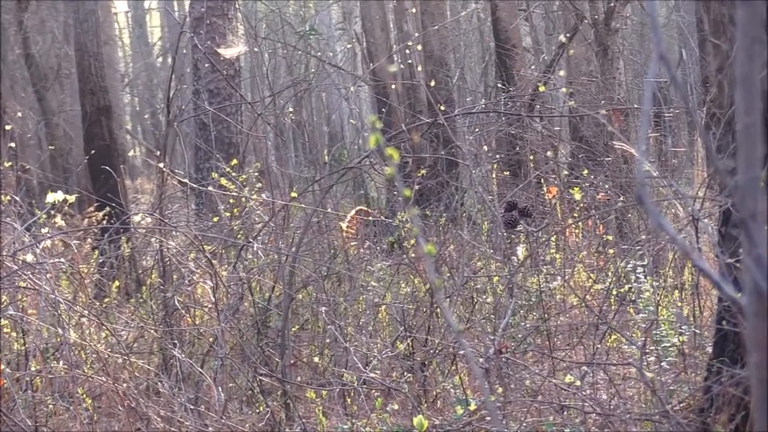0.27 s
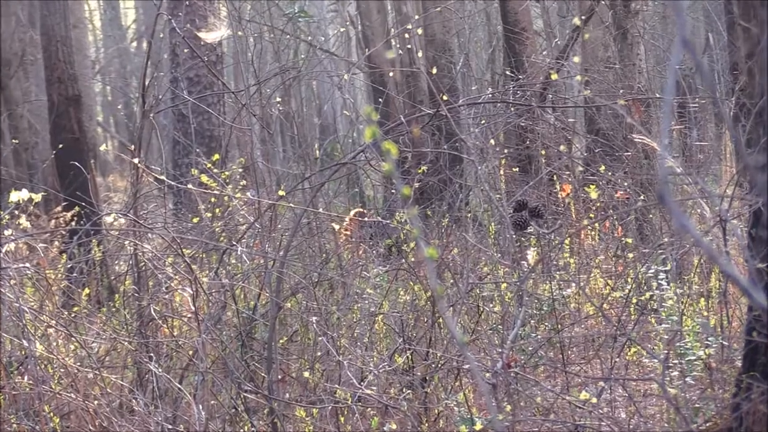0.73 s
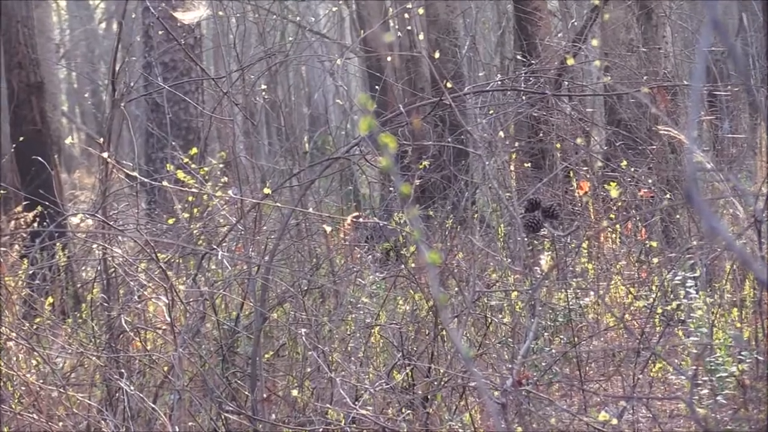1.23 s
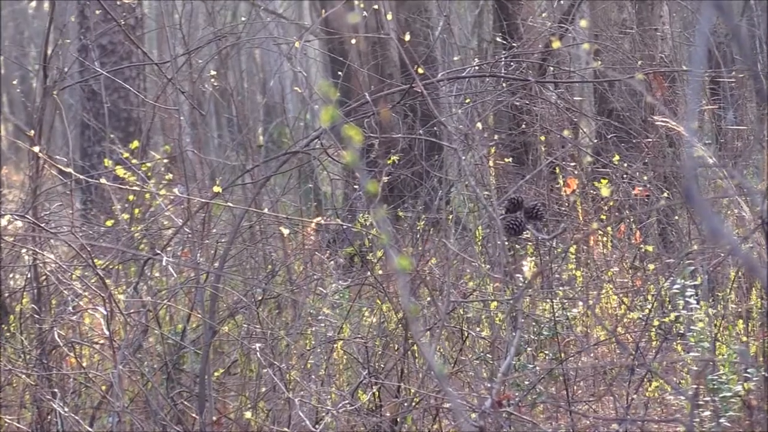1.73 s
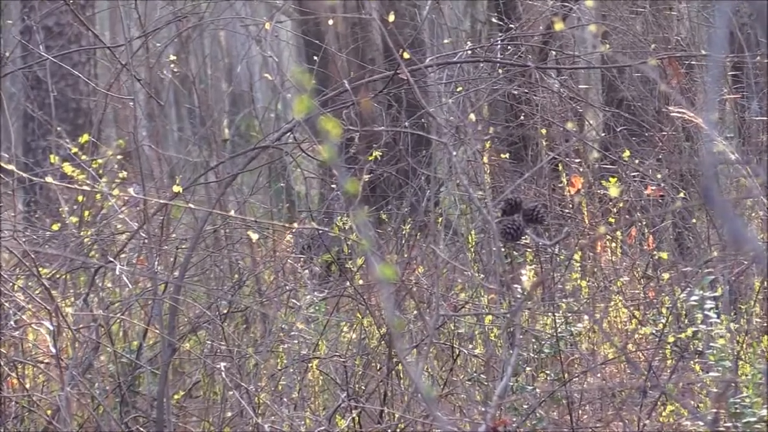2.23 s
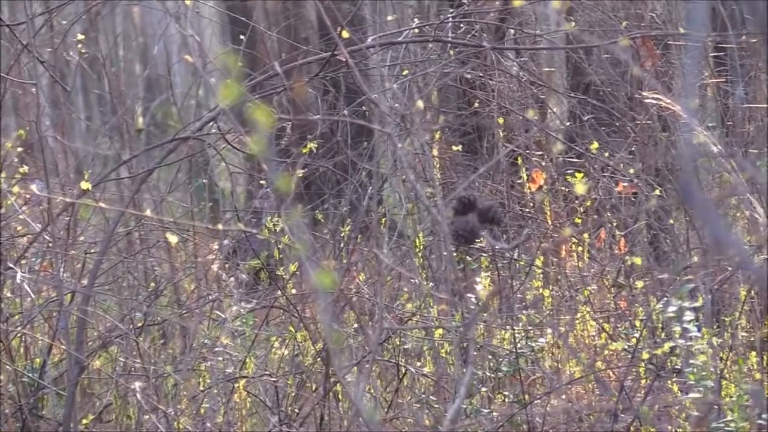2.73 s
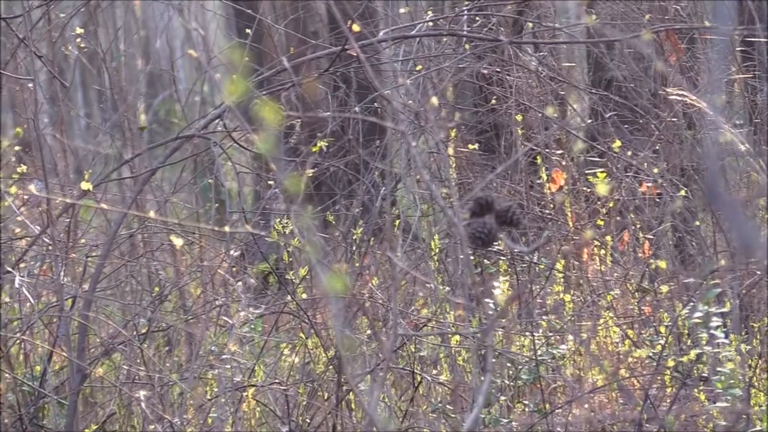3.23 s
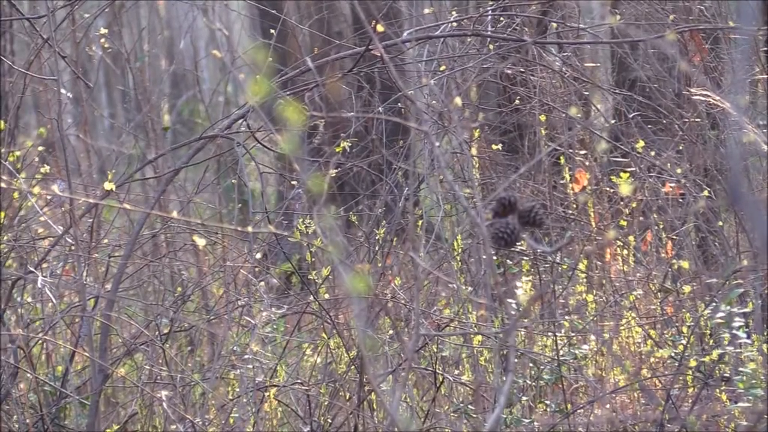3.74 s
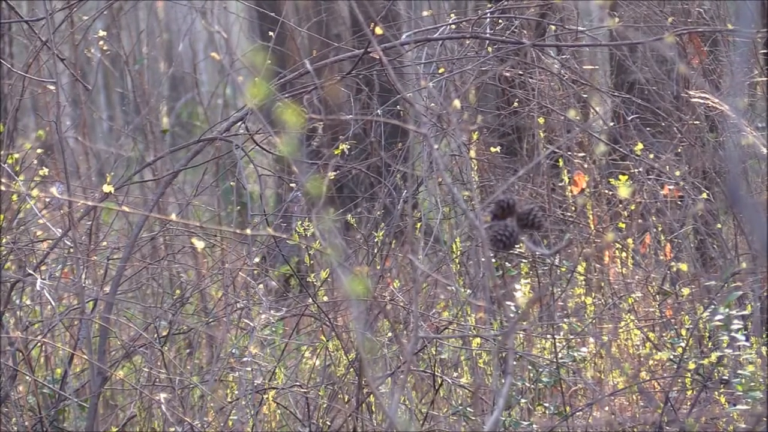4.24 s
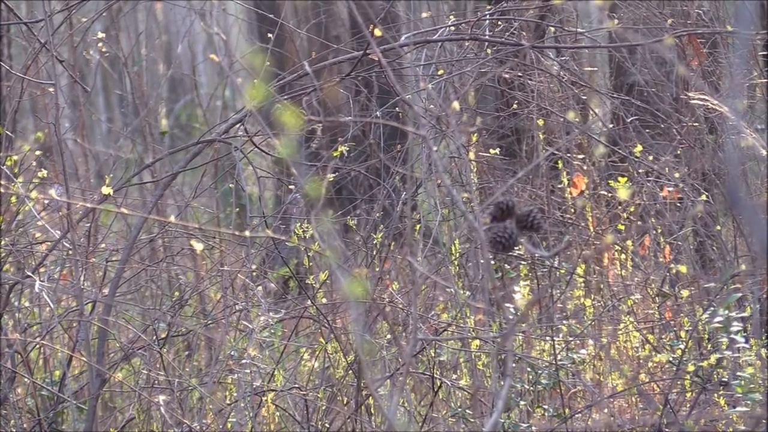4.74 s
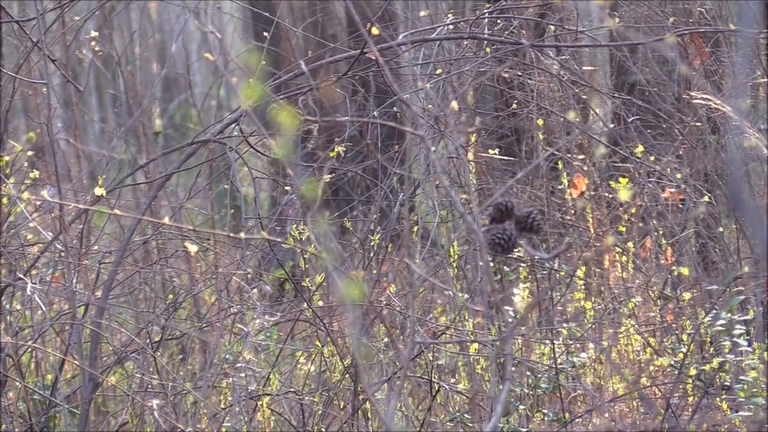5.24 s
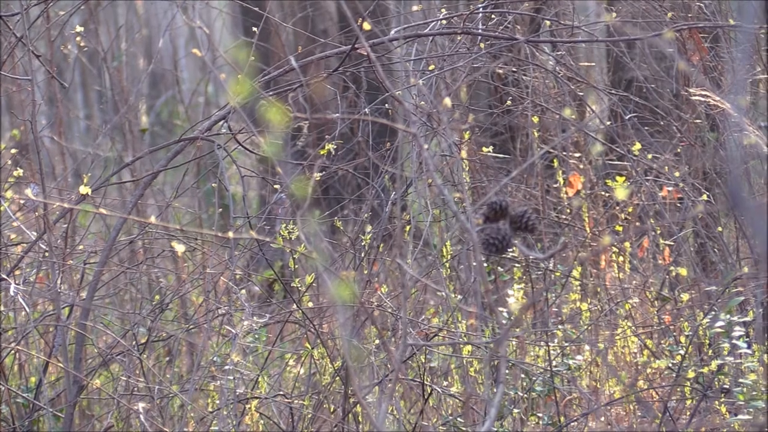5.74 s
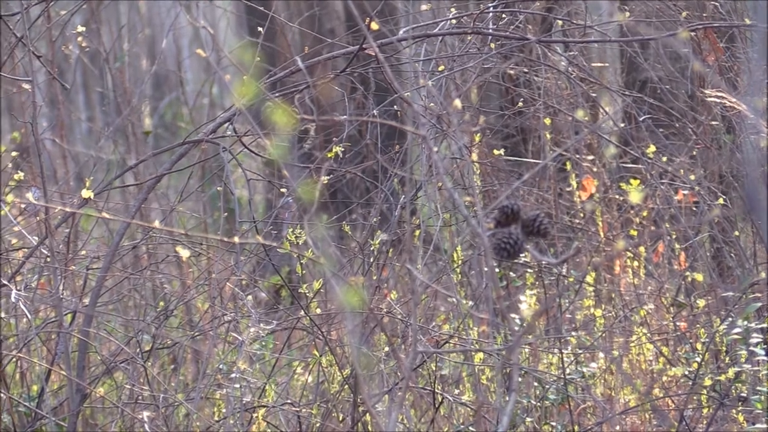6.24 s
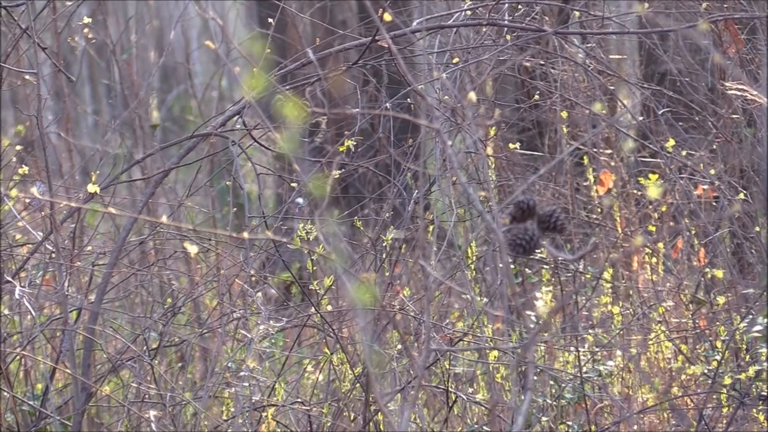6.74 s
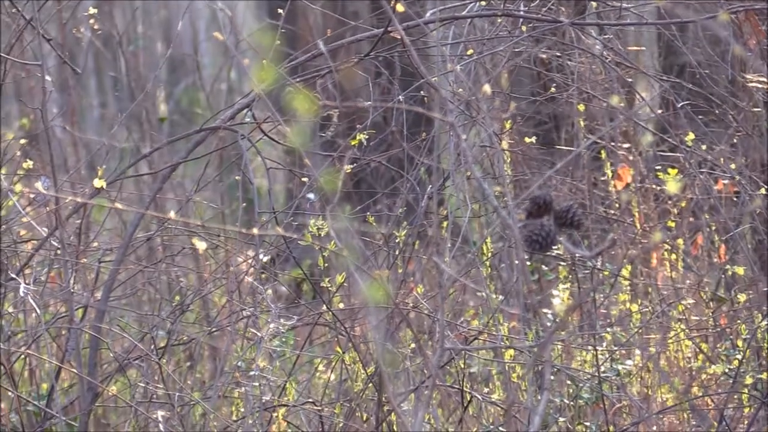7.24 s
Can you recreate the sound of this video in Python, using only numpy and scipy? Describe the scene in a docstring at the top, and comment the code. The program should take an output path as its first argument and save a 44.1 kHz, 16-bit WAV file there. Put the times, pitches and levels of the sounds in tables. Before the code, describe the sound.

In open woods, distant birds sing in a soft haze over low airy rush and a faint wavering hum. Two thin whistles slide downward, then a buzzy song climbs in pitch. Midway, a turkey call close to the microphone gives a cluck and five raspy yelps, each breaking from a clear high note to a rougher low one, echoing off trunks. Evenly spaced chips and a swelling trill finish.

```python
"""Turkey call in open woods, morning

Close to the microphone a turkey call, likely a hunter's mouth call, gives one cluck and five raspy yelps, each
a clear high note that breaks into a lower, rougher one: sine overtones, random pulses ringing resonances, and
filtered noise for breath. Songbirds whistle, chip, trill and buzz as gliding sines, and the trunks echo all of
it. Banded noise makes the far chorus and the air, wavering sines the far drone; the camera adds hiss, a few
soft bumps and faint ticks."""
import sys
import numpy as np
from scipy import signal
from scipy.fft import rfft, irfft, next_fast_len
from scipy.io import wavfile
from scipy.ndimage import uniform_filter1d, map_coordinates

SR = 44100
rng = np.random.default_rng(int(sys.argv[2]) if len(sys.argv) > 2 else 0)


def to_wav(sig):
    """Store sig (one row per channel, or 1-D mono) as 16-bit WAV at the path in sys.argv[1].

    Samples outside -1..1 are clipped; the rate is SR.
    """
    pcm = np.clip(np.atleast_2d(sig), -1, 1) * 32767
    pcm = np.round(pcm).astype(np.int16)
    wavfile.write(sys.argv[1], SR, pcm.T)  # frames by channels


N = 329868


def amp(db):
    """Decibels to gain."""
    return 10 ** (np.asarray(db) / 20)


def unit(x):
    """x at rms 1."""
    return x / np.sqrt(np.mean(x ** 2) + 1e-20)


def along(points, hz):
    """Interpolate (Hz, value) points on a log frequency axis."""
    f, v = np.transpose(points)
    return np.interp(np.log(hz + 1), np.log(f + 1), v)


def curves(rows):
    """One value per sample for each column after the time."""
    s, *cols = np.transpose(rows)
    return [np.interp(np.arange(N) / SR, s, c) for c in cols]


def note(rows, fade=0.0013):
    """First sample, a soft-edged gate and the columns, from first row to last."""
    s, *cols = np.transpose(rows)
    t = np.arange(s[0], s[-1], 1 / SR)
    gate = np.clip(np.minimum(t - s[0], s[-1] - t) / fade, 0, 1)
    return (round(s[0] * SR), gate, *[np.interp(t, s, c) for c in cols])


def add(track, start, x):
    """Mix x into track from sample start."""
    track[start:start + len(x)] += x[:len(track) - start]


def wobble(rate):
    """A smooth random curve, rate knots a second."""
    return map_coordinates(rng.standard_normal(int(N * rate / SR) + 4), [np.arange(N) * rate / SR])


def filtered(x, response):
    """x times a complex response of frequency."""
    m = next_fast_len(N + SR // 2)
    return irfft(rfft(x, m) * response(np.fft.rfftfreq(m, 1 / SR)), m)[..., :N]


def peak(f, hz, width_hz):
    """One causal resonance."""
    return 1j * f * width_hz / (hz * hz - f * f + 1j * f * width_hz)


def resonances(f, modes):
    """Steep-sided resonances, each applied twice; neighbours oppose each other, so the valleys are deep."""
    return sum((-1) ** k * amp(db) * peak(f, hz, width) ** 2 for k, (hz, width, db) in enumerate(modes))


def span(f, low_hz, high_hz):
    """A flat band with steep edges."""
    return 1 / (1 + (2 * (f - (low_hz + high_hz) / 2) / (high_hz - low_hz)) ** 8)


def rush(response, patchy_db):
    """Filtered noise of rms 1 with patches of random gain over time and frequency."""
    z = signal.stft(rng.standard_normal(N), nperseg=512)[2]
    field = uniform_filter1d(uniform_filter1d(rng.standard_normal(z.shape), 5, 0), 12, 1)
    patchy = signal.istft(z * amp(patchy_db * unit(field)), nperseg=512)[1][:N]
    return unit(filtered(patchy, response))


def whistle(track, rows, overtone_db=-40, rough_hz=0):
    """Add a gliding sine with a weak octave; rows (s, Hz, dB rms)."""
    start, gate, hz, db = note(rows)
    shake = np.repeat(rng.standard_normal(len(hz) // 100 + 1), 100)[:len(hz)]
    turn = 2 * np.pi * np.cumsum(hz + rough_hz * uniform_filter1d(shake, size=100)) / SR
    add(track, start, np.sqrt(2) * gate * amp(db) * (np.sin(turn) + amp(overtone_db) * np.sin(2 * turn)))


def series(first, last, period, first_db, last_db):
    """Evenly spaced notes under a steady change of level: rows (s, dB)."""
    return np.linspace((first, first_db), (last, last_db), round((last - first) / period) + 1)


def hiss():
    """Camera hiss common to both channels: patchy coloured noise with nothing below 1 kHz."""
    # colour of the hiss before it is set to its level: (frequency [Hz], relative density [dB per Hz])
    hiss_colour = [(1200, 8.5), (2000, 3.5), (4500, -21), (6000, 0), (7500, -1.5), (11000, -4),
                   (15700, -6.5)]
    return amp(-75) * rush(lambda f: amp(along(hiss_colour, f)) * (f > 1000), patchy_db=1.5)


def side_hiss():
    """Noise of opposite sign in the two channels, which gives the hiss its width."""
    # colour of the side noise before it is set to its level: (frequency [Hz], relative density [dB per Hz])
    side_colour = [(15, -34), (25, -8), (101, -3.5), (411, -9), (827, -19), (1310, -15.5), (2700, -19.5),
                   (7120, -14), (15500, -17)]
    return amp(-78.5) * rush(lambda f: amp(along(side_colour, f)), patchy_db=-1.5)


def wind():
    """Far wind and traffic: coloured noise whose level drifts slowly."""
    # course of the air: (time [s], level [dB])
    air_course = [(0, -61.5), (.3, -60), (2.2, -63.5), (2.7, -62.5), (6.27, -64), (6.9, -60.5),
                  (7.48, -61.5)]
    # colour of the air: (frequency [Hz], relative density [dB per Hz])
    air_colour = [(15, -50), (25, -18.5), (97, -8), (135, -5), (174, -9), (216, -7), (346, -10),
                  (471, -7.5), (525, -4), (585, -9.5), (826, -7), (1100, -16), (1400, -20.5), (1700, -26.5),
                  (1900, -25), (2470, -45), (4180, -120)]
    level_db = curves(air_course)[0] + 0.37 * wobble(7)
    return amp(level_db) * rush(lambda f: amp(along(air_colour, f)), patchy_db=1.5)


def drone():
    """A far hum: low sines that waver at random in pitch and strength."""
    # course of the whole hum: (time [s], level [dB])
    drone_course = [(0, -66), (2.1, -68), (2.35, -63), (3.17, -63.5), (3.37, -56.5), (4.54, -64),
                    (4.94, -60), (5.31, -80), (6.48, -65.5), (7.48, -92)]
    # lines of the hum: (pitch [Hz], twice the scale of its waver [Hz], level within the hum [dB])
    drone_lines = [(138.3, 9.6, -1.5), (125, 1.9, -13.5)]
    lines = np.zeros(N)
    for hz, waver, db in drone_lines:
        strength = amp(db + 1.57 * wobble(16))
        pitch = hz + waver * wobble(14) / 2
        lines += strength * np.sin(2 * np.pi * np.cumsum(pitch) / SR)
    return amp(curves(drone_course)[0]) * lines


def gusts():
    """Slow pressure on the microphone: a smooth random curve that swells with each gust."""
    # gusts: (time of the peak [s], peak level [dB], rise and fall time each [s])
    gust_peaks = [(2.91, -64, .4), (4.65, -72, 0.55), (7.23, -77, .2)]
    calm_db = -91.5
    t = np.arange(N) / SR
    push_db = calm_db + sum((db - calm_db) * np.clip(1 - abs(t - s) / width, 0, 1) for s, db, width in gust_peaks)
    return amp(push_db) * wobble(70)


def whine():
    """A faint steady tone that fades in and out."""
    # stretches of the tone: (start [s], end [s], level after the fade in [dB], level before the fade out [dB])
    whine_spans = [(0.298, 3.03, -83.5, -80), (5.301, 6.8, -80, -83)]
    hz, fade_s = 1400, 0.32
    track = np.zeros(N)
    for s, end, first_db, last_db in whine_spans:
        whistle(track, [(s, hz, first_db - 13), (s + fade_s, hz, first_db),
                        (end - fade_s, hz, last_db), (end, hz, last_db - 16)])
    return track


def handling():
    """Soft bumps on the camera body as dying low sines, and faint dry ticks as bright noise."""
    # bumps: (time [s], level before onset and decay [dB], pitch [Hz])
    bumps = [(2.88, -51, 129), (3.057, -49, 209), (4.5, -56, 168), (7.192, -58, 68)]
    # ticks: (time [s], gain of the noise at the start [dB])
    ticks = [(3.4144, -81), (7.1402, -57)]
    track, t = np.zeros(N), np.arange(SR // 8) / SR
    for s, db, hz in bumps:
        onset = 1 - np.exp(-t / 0.0013)
        add(track, round(s * SR), amp(db - 60 * t / 0.1) * np.sin(2 * np.pi * hz * t) * onset)
    for s, db in ticks:
        add(track, round(s * SR), amp(db - 60 * t / .012) * np.diff(rng.standard_normal(len(t) + 1)))
    return track


def chorus():
    """Distant singers, blurred by the trees into a haze of noise over the range of their songs."""
    # course of the haze: (time [s], level of the low, middle and high singers [dB each])
    chorus_course = [(0, -77, -76.5, -82.5), (.8, -82.5, -80, -84), (1.15, -73, -74, -86),
                     (1.75, -78, -78, -85), (2.1, -77, -75.5, -78.5), (2.9, -69, -74, -84),
                     (3.6, -76, -77.5, -81), (4.35, -80.5, -76, -84), (5.3, -69.5, -74.5, -82),
                     (5.8, -65.5, -65.5, -81.5), (6.6, -65.5, -64.5, -79), (7.48, -71.5, -71.5, -81)]
    # range of each group of singers: (lowest [Hz], highest [Hz])
    singers = [(2000, 3450), (3300, 4780), (4700, 5650)]
    return sum(amp(db) * rush(lambda f: span(f, *edges), patchy_db=1.5)
               for db, edges in zip(curves(chorus_course), singers))


def far_phrases():
    """Phrases too distant to keep their notes apart: bursts of banded noise that hold, then die away."""
    # phrases: (time [s], held [s], lowest [Hz], highest [Hz], level while held [dB])
    phrases = [(0.571, .2, 2700, 3560, -77.5), (2.689, 0.15, 2660, 3860, -65.5),
               (3.84, 0.1, 6950, 8000, -83), (4.419, 0.056, 2000, 3360, -59.5),
               (5.71, 0.043, 4730, 6150, -72.5), (6.11, .08, 4740, 5600, -78),
               (6.199, 0.055, 4760, 6280, -70.5)]
    track, t = np.zeros(N), np.arange(SR // 2) / SR
    f = np.fft.rfftfreq(len(t), 1 / SR)
    for s, held, low_hz, high_hz, db in phrases:
        blur = irfft(rfft(rng.standard_normal(len(t))) * span(f, low_hz, high_hz), len(t))
        dying = amp(db - 39 * np.maximum(t - held, 0))  # 39 dB a second
        add(track, round(s * SR), unit(blur) * np.minimum(t / 0.007, 1) * dying)
    return track


def far_slurs():
    """Single slurs and a run of even upstrokes from farther birds; leaves break up their level."""
    # slurs: (time [s], length [s], from [Hz], to [Hz], level at mid-note [dB])
    # a negative length plays the slur backwards, ending at its time
    slurs = [(.07, 0.008, 5100, 5200, -77), (.1, 0.024, 4780, 4650, -72), (0.239, .03, 4700, 4600, -73.5),
             (0.376, 0.026, 4700, 4700, -76), (.755, 0.052, 5860, 4580, -78),
             (0.898, 0.03, 4250, 3900, -74), (0.978, 0.054, 3800, 3150, -71),
             (1.086, 0.039, 5730, 4150, -70.5), (1.876, 0.076, 6120, 4360, -70),
             (2.657, 0.034, 5300, 3230, -69), (2.699, 0.03, 3110, 3600, -64),
             (2.871, -0.089, 4910, 3270, -66), (5.119, 0.0034, 3050, 3880, -49.5),
             (5.776, 0.05, 3200, 3410, -64), (6.215, 0.046, 5000, 4370, -71),
             (6.409, 0.077, 4200, 4800, -79), (7.45, 0.053, 3680, 3890, -60)]
    # upstrokes: first [s], last [s], period [s], length [s], from [Hz], to [Hz], first level [dB], last level [dB]
    warble = (.925, 1.76, .1045, .055, 4300, 5000, -76, -78)
    track = np.zeros(N)
    strokes = [(s, *warble[3:6], db) for s, db in series(*warble[:3], *warble[6:])]
    for s, length, from_hz, to_hz, db in slurs + strokes:
        knee_hz = from_hz + .7 * (to_hz - from_hz)  # the glide slows near to_hz
        rows = [(s, from_hz, db - 4), (s + length / 2, knee_hz, db), (s + length, to_hz, db - 3)]
        whistle(track, sorted(rows))
    return track * amp(3 * wobble(90))


def buzzer():
    """Short notes climbing the scale, shaken some 270 times a second: the higher, the harder."""
    # course of the song: (time [s], pitch [Hz], level before the shake [dB], glide across a note [Hz])
    buzz_course = [(2.8, 4680, -75, -250), (3.1, 4595, -68, -200), (3.4, 4674, -62.5, -100),
                   (3.73, 4890, -61, 121), (4.13, 5540, -58.5, 252), (4.5, 5960, -58, 259),
                   (4.63, 6100, -86, 215)]
    # start of each note [s]
    buzz_starts = [2.805, 2.917, 3.036, 3.145, 3.267, 3.378, 3.491, 3.606, 3.73, 3.865, 4.001, 4.128, 4.245,
                   4.381, 4.505, 4.629]
    track, t = np.zeros(N), np.arange(round(.14 * SR)) / SR
    course = curves(buzz_course)
    lengths = .72 * np.gradient(buzz_starts)  # share of its slot that a note fills
    for s, length in zip(buzz_starts, lengths):
        gate = np.clip(np.minimum(t, length - t) / .015, 0, 1)
        hz, db, glide_hz = [c[round(s * SR)] for c in course]
        swing_hz = 15 + .24 * max(hz - 4700, 0)
        drift = .5 * np.cumsum(rng.standard_normal(len(t))) / np.sqrt(len(t))
        flutter = 2 * np.pi * (272 * t + drift)
        pitch = hz + swing_hz * np.sin(flutter) + glide_hz * (t / length - .5)
        strength = 1 + min(swing_hz / 500, 1) * np.sin(flutter + 1.26)
        tone = np.sin(2 * np.pi * np.cumsum(pitch) / SR)
        add(track, round(s * SR), np.sqrt(2) * amp(db) * gate * strength * tone)
    return track


def falling(s, length, db, sag_hz, hollow_hz, loudest):
    """A whistle that flicks up, then slides down: rows (s, Hz, dB)."""
    # swell after the loudest point: (share of length, level against the loudest [dB])
    whistle_swell = [(.3, -8.5), (.65, -11.5), (.84, -6.5), (.97, -14.5), (1, -44)]
    top_hz, end_hz, flick_hz = 3260, 1852, 319
    u = np.linspace(0, 1, num=80)  # share of the length
    hz = top_hz + (end_hz - top_hz) * u
    hz = hz - hollow_hz * np.sin(np.pi * u) - flick_hz * np.exp(-u / 0.0083)
    hz = hz - sag_hz * u / 0.24 * np.exp(1 - u / 0.22)
    swell_db = np.interp(u, *np.transpose([(0, -4), (loudest, 0), *whistle_swell]))
    return np.transpose([s + u * length, hz, db + swell_db])


def whistles():
    """Falling whistles and one rising whistle: gliding sines with a weak octave."""
    # falling: (time [s], length [s], loudest [dB], early sag [Hz], hollow of the fall [Hz], loudest at share of length)
    falls = [(0.848, .595, -59.5, -89.5, 140, 0.12), (1.972, .548, -55.5, 192, -41, 0.04)]
    # the rising whistle: (time [s], pitch [Hz], level [dB])
    rising = [(5.003, 1940, -67), (5.025, 2745, -55), (5.078, 2856, -51.5), (5.106, 3000, -54),
              (5.159, 2940, -71)]
    track = np.zeros(N)
    for row in falls:
        whistle(track, falling(*row))
    whistle(track, rising, overtone_db=-18)
    return track


def chips_and_trills():
    """Rising chips and trill notes, each sung from one pattern with a slightly different pitch every time."""
    # chips: (time [s], level added to the pattern [dB], length against the pattern)
    chips = [(2.033, -57.5, .6), (2.688, -59, .5), (3.041, -54, .55), (4.434, -60, .6), (5.296, -58, 1),
             (5.804, -57.5, 1), (6.02, -59, 1), (6.232, -60, 1), (6.454, -60, 1), (6.663, -57, 1),
             (6.9, -56.5, 1), (7.155, -56.5, 1.2)]
    # pattern of a chip: (time from the chip [s], pitch [Hz], relative level [dB])
    chip_pattern = [(-.035, 2140, -17), (-.02, 2356, -10), (0, 2651, -2), (.012, 2800, 4.5),
                    (0.018, 3100, -2), (.025, 3900, -16)]
    # trills: (first note [s], last note [s], period [s], first level [dB], last level [dB])
    trills = [(2.083, 2.623, .09, -76, -73.5), (6.628, 7.405, .0706, -70.5, -56)]
    # pattern of a trill note: (time from the note [s], pitch [Hz], relative level [dB])
    trill_pattern = [(-.03, 3400, -12), (-.022, 3800, -3), (-.011, 4450, -19), (0, 5000, -5),
                     (.01, 5300, 0), (.022, 5500, -8)]
    track = np.zeros(N)
    for s, db, stretch in chips:
        detune = 1 + 0.01065 * rng.standard_normal()
        whistle(track, np.array(chip_pattern) * [stretch, detune, 1] + [s, 0, db], rough_hz=85)
    for row in trills:
        for s, db in series(*row):
            detune = 1 + 0.0106 * rng.standard_normal()
            whistle(track, np.array(trill_pattern) * [1, detune, 1] + [s, 0, db])
    return track


def foliage(x):
    """Leaves and twigs scatter a far song: it flutters and smears over a few hundredths of a second."""
    t = np.arange(round(.06 * SR)) / SR
    smear = rng.standard_normal(len(t)) * amp(-60 * t / 0.07)
    fluttering = x * amp(1.5 * wobble(45))
    return fluttering + amp(-7) * signal.fftconvolve(fluttering, smear / np.linalg.norm(smear))[:N]


def high_note(s, length, hz, glide_hz, drop_hz, db, swell_db, octave_db):
    """The clear opening slides into pitch, swells, then gives way: rows (s, Hz, dB, octave dB)."""
    t = np.arange(0, length, .001)
    level_db = db - swell_db * np.interp(t / length, [0, 0.6, 1], [1, 0, 1])
    pitch = hz + glide_hz * t / length + drop_hz * np.exp(-t / 0.004)
    return np.transpose([s + t, pitch, level_db, octave_db + 0 * t])


def low_note(s, length, hz, glide_hz, peak_s, entry_db, peak_db, close_db, rough_s, rasp_db, catch_db):
    """The note enters rough, settles, fades and ends on a catch: rows (s, Hz, clear dB, rasp dB)."""
    entry_s, settle_s, catch_s = .008, .006, 0.0083  # rise of the note, dying of the rasp, last catch
    edge_db, settle_db = 22, 19  # edges under the note, settled rasp under the rough one
    t = np.arange(0, length, .001)
    close_s = length - catch_s
    clear = np.interp(t, [0, entry_s, peak_s, close_s, length],
                      [entry_db - edge_db, entry_db, peak_db, close_db, close_db - edge_db])
    settled_db = rasp_db - settle_db
    rasp = np.interp(t, [0, entry_s, rough_s, rough_s + settle_s, close_s - catch_s, close_s, length],
                     [rasp_db - edge_db, rasp_db, rasp_db, settled_db, settled_db, catch_db, catch_db - edge_db])
    return np.transpose([s + t, hz + glide_hz * t / length, clear, rasp])


def yelps():
    """Clear overtones on the pitch, pulses of random size that ring resonances, and air hissing through the call."""
    # a yelp, high note then low note: (time [s], high note length [s], its pitch [Hz], its glide [Hz],
    #  slide into pitch [Hz], level at its peak [dB], its ends under the peak [dB], its octave against it [dB],
    #  low note length [s], its pitch [Hz], its glide [Hz], time to its peak [s],
    #  clear drive at entry, at peak and at close [dB each], rough until [s into the low note],
    #  rasp drive [dB], rasp drive at the closing catch [dB], breath drive [dB]);
    #  the low note's drives come before the overtone strengths and resonances colour them
    yelp_rows = [(4.097, 0.021, 900, -60, 144, -36.5, 10, -16, 0.065, 632.6, 25, .025, -28.5, -30.5, -40, .036, -31, -44, -41.5),
                 (4.442, .014, 916, -120, 247, -40.5, 12, -22, .1, 664.5, 26.5, 0.052, -27, -21.5, -42.5, .034, -27.5, -40, -38),
                 (4.794, .028, 917, 92, -5, -24, 17, -14, .072, 680, 40, 0.029, -26.5, -27.5, -36.5, .018, -34.5, -33, -37),
                 (5.162, .021, 855, 40.5, 207, -39, 10, 3, .07, 705.7, -35, .025, -38, -27.5, -38, .055, -38.5, -29, -45.5),
                 (5.540, 0.018, 882, -4, 201, -38, 6.5, -5, .071, 698.4, -24.5, 0.049, -32, -25.5, -32, .05, -35, -35, -41.5)]
    # strength of the low note's overtones: (frequency [Hz], gain [dB])
    overtone_colour = [(500, 7), (680, -14.5), (1350, -2), (2050, -12.5), (2750, -23), (3400, -40),
                       (4050, -25), (4800, -36), (6000, -73.5), (8000, -62), (9400, -49.5), (10800, -62),
                       (12000, -66), (13500, -52.5)]
    # resonances rung by the pulses: (frequency [Hz], width [Hz], gain before the rasp's own [dB])
    rasp_modes = [(382, 220, -20.5), (1024, 290, 0), (1240, 120, 4.5), (1630, 170, -18), (1830, 225, -3),
                  (2530, 990, -18), (3650, 100, -20), (4570, 400, -55)]
    # treble resonances that the airstream hisses through: (frequency [Hz], width [Hz], gain [dB])
    breath_modes = [(3880, 520, 14.5), (8400, 490, -8.5), (10800, 960, -4.5), (12400, 410, -12),
                    (13000, 970, -6.5)]
    clear, pulses, flow, shake = np.zeros(N), np.zeros(N), np.zeros(N), wobble(250)
    for yelp in yelp_rows:
        start, gate, hz, db, octave_db = note(high_note(*yelp[:8]))
        turn = 2 * np.pi * np.cumsum(hz) / SR
        upper = np.sin(2 * turn) + amp(-16) * np.sin(3 * turn) + amp(-20) * np.sin(4 * turn)
        add(clear, start, np.sqrt(2) * gate * amp(db) * (np.sin(turn) + amp(octave_db) * upper))
    order = np.arange(1, 22)[:, None]
    for s, high_s, *yelp, breath_db in yelp_rows:
        low_s = s + high_s - .007  # the low note starts under the high one
        start, gate, hz, clear_db, rasp_db = note(low_note(low_s, *yelp[6:]))
        rough = amp(np.minimum(rasp_db - clear_db, 0))  # the raspier, the less steady the pitch
        cycles = np.cumsum(hz * (1 + .045 * rough * shake[start:start + len(hz)])) / SR
        stack = amp(along(overtone_colour, order * hz)) * np.sin(2 * np.pi * order * cycles)
        add(clear, start, np.sqrt(2) * gate * amp(clear_db) * stack.sum(axis=0))
        closing = np.diff(np.floor(cycles), prepend=0)  # one pulse a cycle
        size = rng.uniform(-np.sqrt(3), np.sqrt(3), len(hz))
        add(pulses, start, closing * gate * amp(rasp_db) * size)
        effort = np.sqrt(amp(clear_db) + amp(rasp_db))  # hiss grows slower than the tone
        add(flow, start, gate * amp(breath_db) * effort)
    soft = lambda f: 1 / (1 + 1j * f / 4500) ** 3  # soft pulses carry little treble
    rasp = amp(36.5) * filtered(pulses, lambda f: resonances(f, rasp_modes) * soft(f))
    breath = filtered(flow * rng.standard_normal(N), lambda f: resonances(f, breath_modes))
    return clear + rasp + breath


def cluck():
    """A quick chord of dying resonances, cut short as the call is stopped."""
    # clucks, each starting 4 ms ahead of its time: (time [s], level added to the resonances [dB])
    clucks = [(3.776, -30.5)]
    # resonances: (frequency [Hz], relative level [dB], time to die by 60 dB if left to ring [s])
    cluck_modes = [(519, -10.5, 0.14), (834, -18.5, 0.26), (1042, 2.5, 0.28), (1970, -18.5, 0.063),
                   (2680, -38, 0.23)]
    track, t = np.zeros(N), np.arange(SR // 4) / SR
    onset = (1 - np.exp(-t / 0.0013)) ** 2
    stop = np.clip((.066 - t) / .02, 0, 1)
    for s, db in clucks:
        ring = sum(amp(level - 60 * t / t60) * np.sin(2 * np.pi * hz * t) for hz, level, t60 in cluck_modes)
        add(track, round((s - .004) * SR), amp(db) * ring * stop * onset)
    return track


def trunk_echoes(x):
    """Separate early echoes off the nearest trunks."""
    # near echoes: (delay [s], level [dB])
    trunks = [(.011, -17), (0.015, -17), (.023, -21), (.034, -18), (.047, -29)]
    return sum(amp(db) * np.roll(x, round(delay * SR)) for delay, db in trunks)


def woods(x):
    """Blurred echoes off the trunks: each frequency dies at its own speed, in a new pattern every quarter second."""
    # decay of the echoes: (frequency [Hz], time to die by 60 dB [s])
    decay_times = [(300, 4.3), (1400, 1.24), (3000, 1.05), (6000, 1.26), (12000, 0.68)]
    out, step = np.zeros(N + 2 * SR), SR // 4
    for start in range(0, N, step):
        hz, t, z = signal.stft(rng.standard_normal(SR), SR, nperseg=256)
        tail = signal.istft(z * amp(-60 * t / along(decay_times, hz)[:, None]), SR, nperseg=256)[1]
        # the tail sets in 600 samples after the sound
        add(out, start + 600, signal.fftconvolve(x[start:start + step], tail / np.linalg.norm(tail)))
    return out[:N]


def scene():
    """Everything lies straight ahead of the microphone; only the hiss differs between the channels."""
    background = wind() + drone() + gusts() + whine() + handling() + hiss() + chorus() + far_phrases()
    buzz = foliage(buzzer())
    birds = foliage(far_slurs() + whistles() + chips_and_trills())
    call = yelps() + cluck()
    echo = trunk_echoes(call) + woods(amp(-27.5) * call + amp(-4.0) * birds + amp(-2.5) * buzz)
    mid = background + buzz + birds + call + echo
    side = side_hiss()
    return np.array([mid + side, mid - side])


def record(dry):
    """The camera keeps nothing above its band limit of 15.7 kHz."""
    return filtered(dry, lambda hz: hz < 15700)


dry = scene()
out = record(dry)
to_wav(out)
```